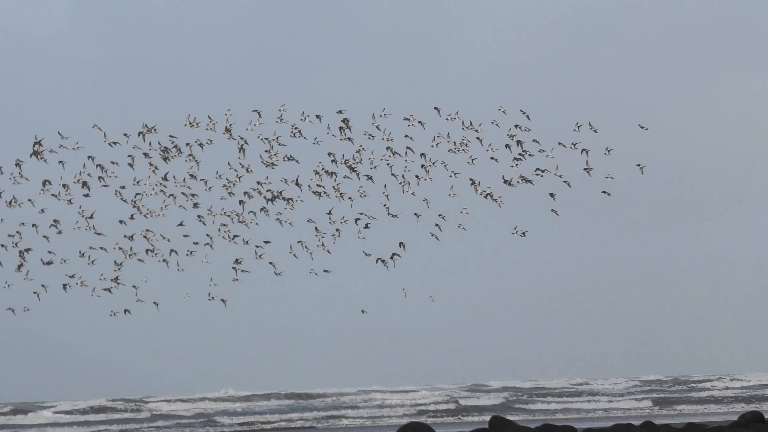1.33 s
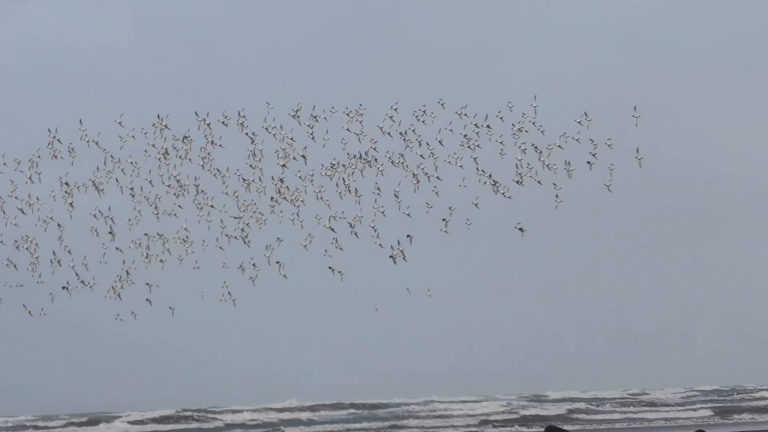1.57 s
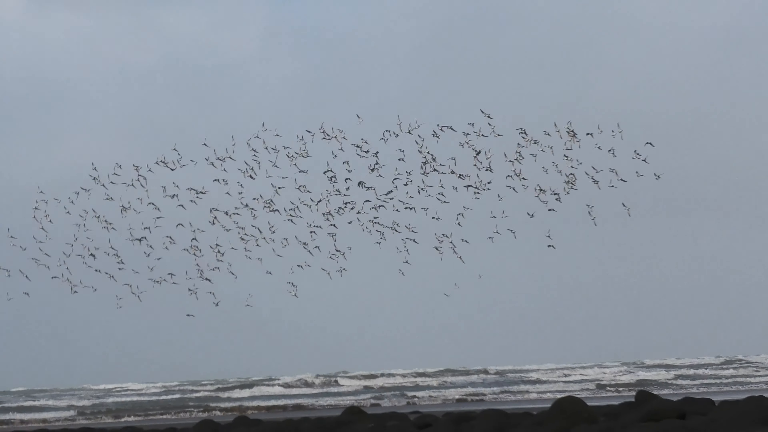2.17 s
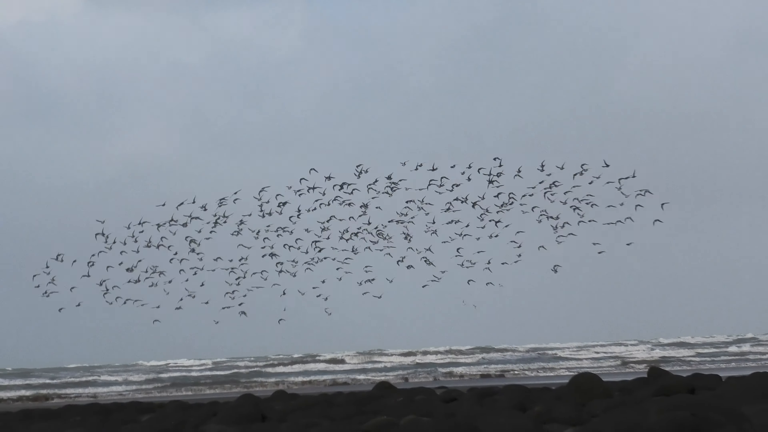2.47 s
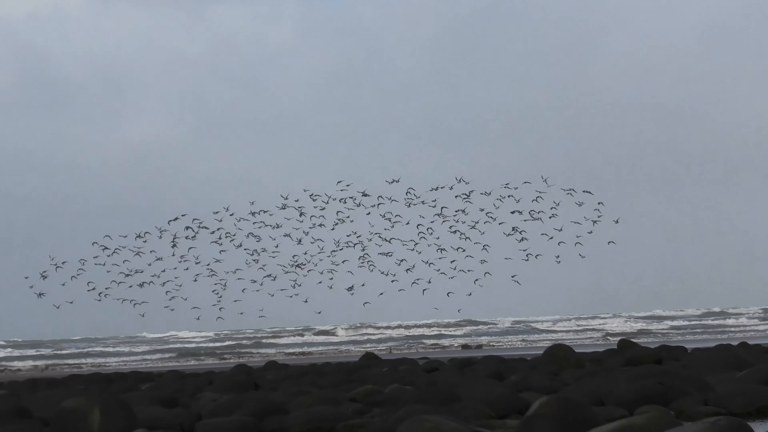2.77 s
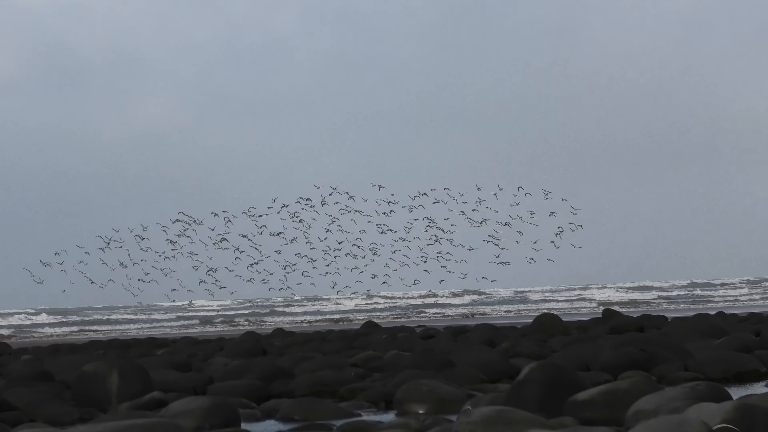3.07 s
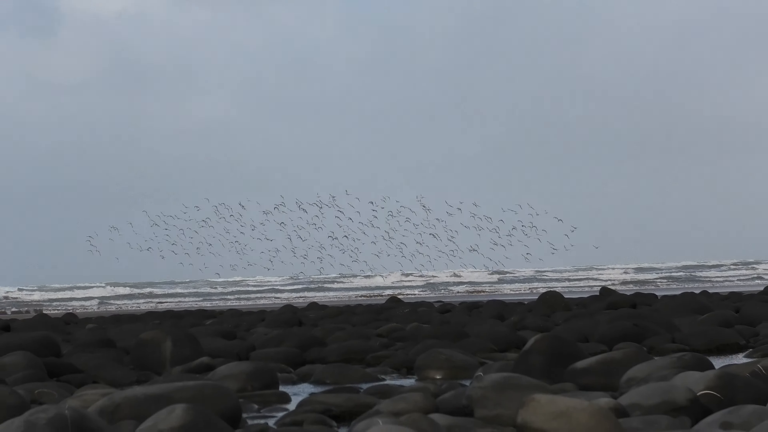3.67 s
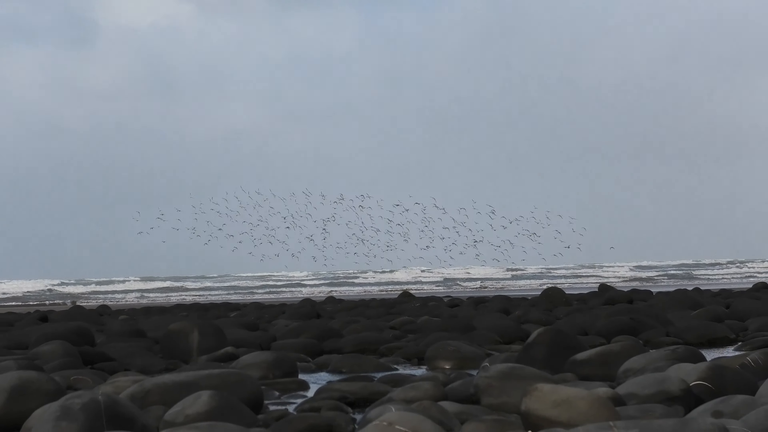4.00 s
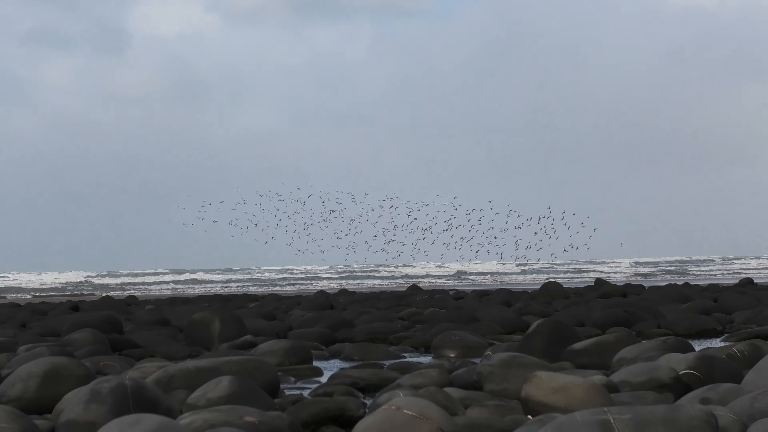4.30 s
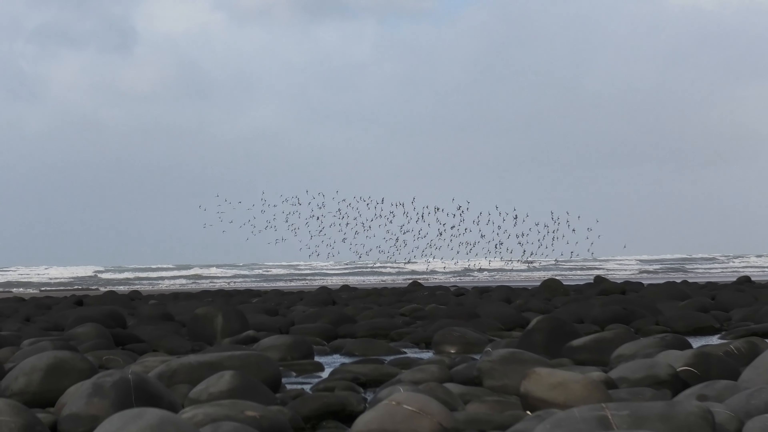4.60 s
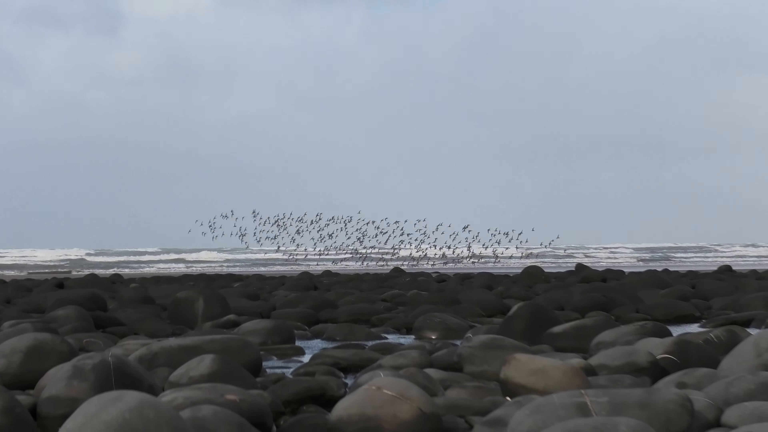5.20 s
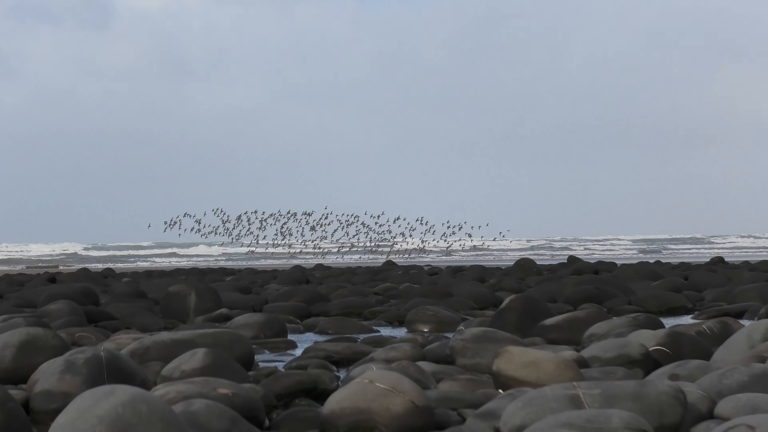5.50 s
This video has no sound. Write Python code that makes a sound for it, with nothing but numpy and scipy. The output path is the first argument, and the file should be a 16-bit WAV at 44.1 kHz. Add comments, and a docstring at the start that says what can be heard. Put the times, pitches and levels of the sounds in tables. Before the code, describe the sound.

Wind blows on the microphone on a boulder shore throughout, a fluttering, surf-like roar with a thin hiss that surges and ducks along with it. Underneath, distant breaking waves blend into a wide, even wash, beside a quiet low rumble that sits mostly on the left. Short blasts and dips shake the roar in the first half second. Around 1 second, three tiny, bright ticks sound close by, followed by a strong gust at about 1.2 seconds. The wind eases by 1.5 seconds, then swells near 2.3 seconds and again from 3 to 3.3 seconds, spitting brief, sharp crackles. From 3.4 to 5 seconds it is a little lower but choppy, with quick blasts and sudden drops. From 5 seconds to the end, at about 5.6 seconds, it grows louder again, with the thickest crackle.

```python
"""A fluttering, surf-like roar and a thin hiss surge and duck together in gusty wind on a boulder shore.
Both are shaped noise, with slow swells, sudden blasts and brief dips; sharp crackles spit on top.
Underneath, distant breaking waves blend into an even wash, beside a low rumble.
A few tiny ticks sound close by."""
import sys
import numpy as np
from scipy import signal
from scipy.fft import rfft, irfft, next_fast_len
from scipy.io import wavfile

SR = 44100
rng = np.random.default_rng(int(sys.argv[2]) if len(sys.argv) > 2 else 0)


def master_out(mix):
    """Clip the mix to full scale and print it as 16-bit PCM to the path in sys.argv[1]."""
    frames = np.transpose(np.atleast_2d(mix))
    ceiling = np.clip(frames, -1, 1)
    pcm = np.round(ceiling * 32767).astype(np.int16)
    wavfile.write(sys.argv[1], SR, pcm)


N = 249165
TIME = np.arange(N) / SR
FREQ = np.maximum(np.arange(N // 2 + 1) * SR / N, 1)


def gain(db):
    """Turn decibels into a number to multiply by."""
    return 10 ** (np.asarray(db) / 20)


def unit(x):
    """Scale to an average size (rms) of 1."""
    return x / np.sqrt(np.mean(x ** 2))


def by_frequency(rows):
    """Turn each column after the first (Hz) into a curve over all frequencies."""
    hz, *columns = np.transpose(rows)
    return [np.interp(np.log(FREQ), np.log(hz), column) for column in columns]


def colour(noise, tone):
    """Shape noise with a tone table, then scale it to size 1."""
    return unit(irfft(rfft(noise) * gain(by_frequency(tone)[0]), N))


def split(x, hz):
    """The parts of a sound below and above a frequency."""
    low = irfft(rfft(x) / (1 + (FREQ / hz) ** 4), N)
    return low, x - low


def band(x, band_hz):
    """Keep what lies between two frequencies."""
    return signal.sosfilt(signal.butter(4, band_hz, "bandpass", fs=SR, output="sos"), x)


def wander(hz):
    """A smooth random wobble of size 1, up to about hz times a second."""
    size = next_fast_len(N)
    freq = np.arange(size // 2 + 1) * SR / size
    slow = rfft(rng.standard_normal(size)) / (1 + (freq / hz) ** 4)
    return unit(irfft(slow, size)[:N])


def stereo_noise(likeness, lead=0):
    """Left and right noise, partly shared; lead shifts the shared part's phase on the right."""
    left, own = rfft(rng.standard_normal((2, N)))
    right = likeness * np.exp(1j * lead) * left + np.sqrt(1 - likeness ** 2) * own
    return irfft(np.array([left, right]), N)


def pan(x, left_db):
    """Make the left side left_db louder than the right."""
    return irfft(rfft(x) * gain(np.array([[.5], [-.5]]) * left_db), N)


def crackle(per_second, spread_db):
    """Tiny random pops: many faint ones and a few that stand out."""
    pops = rng.random(N) < per_second / SR
    size = np.minimum(rng.exponential(size=N), 6)
    return unit(pops * gain(spread_db * size) * rng.choice([-1, 1], N))


def swells(rows, steepness=2.93):
    """Brief bumps and dips in dB; the level builds more slowly than it drops."""
    level_db = np.zeros(N)
    for time, half_length, db in rows:
        near = slice(*np.searchsorted(TIME, [time - 5 * half_length, time + 5 * half_length]))
        age = TIME[near] - time
        rising = (age < 0) == (db > 0)
        width = half_length * np.where(rising, 1.15, .85)
        level_db[near] += db * np.exp(-.5 * np.abs(age / width) ** steepness)
    return level_db


# Slow changes in the loudness of the roar: (time [s], level [dB])
SURGE_LEVELS = [(0.0, -35.5), (0.6, -32.5), (0.8, -34), (0.95, -37), (1.16, -34), (1.2, -27), (1.33, -29.5),
                (1.38, -34.5), (1.5, -37.5), (1.91, -36), (2.28, -31), (2.39, -32.5), (2.84, -33.2),
                (3.0, -29.5), (3.1, -30), (3.19, -31), (3.42, -37.5), (3.55, -35.5), (3.65, -36.5),
                (4.08, -32.5), (4.14, -37), (4.99, -32), (5.07, -28.5), (5.21, -28.5), (5.38, -30.5),
                (5.45, -29.5), (5.65, -29)]
def surges():
    """The slow rise and fall that the roar and hiss share, in dB."""
    return np.interp(TIME, *np.transpose(SURGE_LEVELS))


def flutter():
    """The loudness shakes at random, faster than the surges; the swing is in dB."""
    wobble_db = 0.2 * wander(hz=39)
    shudder_db = 1.13 * wander(hz=65.6)
    swing_db = wobble_db + shudder_db
    swing_db -= .12 * swing_db ** 2  # dips go deeper than peaks go high
    return split(swing_db, hz=1.1)[1]  # keep only the fast part


# Tone of the roar: (frequency [Hz], relative level [dB])
ROAR_TONE = [(60, -55), (100, -30.5), (150, -9), (210, -2), (380, 3.5), (560, 1), (950, -4.5),
             (1700, -14.5), (2500, -26.5), (3500, -38), (5000, -53.5), (7000, -74), (11000, -100)]
# Its stereo spread: (frequency [Hz], likeness [0-1], right lead [radians], left minus right [dB])
ROAR_STEREO = [(129, 0.1, -2.5, 8), (218, 0.48, 2, 4.5), (440, 0.33, 3, 0.4), (1300, 0.41, 3, 1.5),
               (2540, 0.52, 2, 0), (3580, 0.5, 2.14, -0.5), (6000, 0.2, 5, -6.5)]
def roar(level_db, flutter_db, bite_db):
    """A surf-like roar: both sides surge together, but each also flickers on its own."""
    likeness, lead, left_db = by_frequency(ROAR_STEREO)
    own_db = 0.93 * np.array([wander(hz=33), wander(hz=24)])
    shared_db = 1.58 * wander(hz=190)
    noise = stereo_noise(likeness, lead) * gain(own_db + shared_db)
    noise = pan(colour(noise, ROAR_TONE), left_db)
    low, high = split(noise, hz=1100)
    # the louder the roar, the brighter it gets
    bright_db = 0.11 * (level_db - level_db.mean()) + bite_db + 0.22 * wander(hz=6.4)
    return (low + gain(bright_db) * high) * gain(level_db + flutter_db + 0.03)


# Loudness of the hiss before the surges are added: (time [s], relative level [dB])
HISS_LEVELS = [(0, -83), (.11, -79), (.53, -84), (.85, -82), (1.0, -77), (1.33, -83), (2.33, -79),
               (2.64, -83), (2.98, -82), (3.35, -84), (3.49, -79), (4.07, -77.5), (4.16, -79), (4.3, -76.5),
               (4.8, -85), (5.2, -79), (5.38, -79.5), (5.65, -76.5)]
# Tone of the hiss: (frequency [Hz], relative level [dB])
HISS_TONE = [(500, -20.5), (1500, 0.5), (3500, 13), (5500, 3.5), (8500, -.5), (10000, -7.5), (12000, -17.5),
             (15000, -20)]
def hiss(surge_db, sudden_db, flutter_db):
    """A fine, crackling hiss rises and falls with the roar, alike on both sides."""
    strength_db = np.interp(TIME, *np.transpose(HISS_LEVELS)) + 0.75 * (surge_db - surge_db.mean())
    swing_db = 0.61 * sudden_db + 0.9 * flutter_db
    noise = stereo_noise(likeness=0.98) * gain(1.7 * wander(hz=400))
    noise += gain(-9) * crackle(per_second=700, spread_db=2)
    low, top = split(colour(noise, HISS_TONE), hz=10800)
    # only the strongest hiss opens the very top into a sizzle
    sizzle_from_db = -76.5
    sizzle_db = np.clip(8 * (strength_db - sizzle_from_db), -2, 8)
    return (low + top * gain(sizzle_db)) * gain(strength_db + swing_db + 8)


# Tone of the rumble: (frequency [Hz], relative level [dB])
RUMBLE_TONE = [(20, -36), (45, -41), (68, -30), (100, -8.5), (135, -2), (175, 1.5), (220, 0.5), (300, 0.5),
               (600, -38.5), (3000, -110)]
def rumble():
    """Big, slow whirls of air keep up a low rumble, mostly on the left."""
    air = colour(stereo_noise(likeness=.6), RUMBLE_TONE)
    return pan(air, left_db=6) * gain(-49.5 + 1.1 * wander(hz=21))


# Tone of the surf: (frequency [Hz], relative level [dB])
SURF_TONE = [(60, -38), (130, -30.5), (250, 8), (550, 0.5), (1100, -5), (2200, -18), (4500, -39),
             (7000, -62.5), (11000, -84)]
def surf():
    """Many distant breaking waves blend into a wide, gently heaving wash."""
    wash = colour(stereo_noise(likeness=0.035), SURF_TONE)
    return wash * gain(-45 + 0.51 * wander(hz=1.8))


# Sudden blasts: (time [s], half length [s], level change [dB], bite [dB])
SUDDEN_BLASTS = [(0.046, 0.016, 6, 3), (0.11, 0.03, 4.5, -1.5), (0.176, 0.008, 12, -1.5),
                 (0.307, 0.021, 4.5, -3), (0.481, 0.0069, 5, 2.5), (0.677, 0.008, -1, 1),
                 (1.133, 0.011, 4, -0.5), (1.438, 0.013, 4.5, 1), (1.618, 0.011, 5.5, -2),
                 (1.7, 0.008, 8.5, -2.5), (1.735, 0.021, 5, 0), (1.859, 0.0039, 3, 1),
                 (1.956, 0.0096, 4.5, -3), (2.057, 0.0082, 2.5, 4.5), (2.107, 0.0027, 1, 3),
                 (2.191, 0.007, 4, 0), (2.21, 0.0038, 4, -1), (2.28, 0.011, 1, 3), (2.454, 0.016, 5, -4.5),
                 (2.573, 0.012, 5, 1.5), (2.598, 0.003, 6.5, 1), (2.637, 0.006, 5, -11),
                 (2.75, 0.0048, 5.5, -6.5), (2.869, 0.0054, 4.5, -2.5), (2.966, 0.013, 1, 3),
                 (3.23, 0.011, 5, 6), (3.255, 0.0074, 7, -1.5), (3.396, 0.0064, 4, 4.5),
                 (3.593, 0.0062, 1.5, -4), (3.672, 0.018, 3.5, 0), (3.715, 0.014, 5.5, 0),
                 (3.788, 0.013, 6.5, -5), (3.829, 0.0077, 4.5, 1.5), (3.91, 0.0085, 3.5, -10),
                 (3.962, 0.017, 4.5, -4), (4.048, 0.011, 3.5, -4), (4.203, 0.0045, 8.5, -6),
                 (4.289, 0.0085, 2.5, 4), (4.4, 0.015, 6.5, -0.5), (4.541, 0.019, 8, -4.5),
                 (4.621, 0.0062, 4.5, 7.5), (4.692, 0.0049, 6.5, -3.5), (4.77, 0.0072, -0.5, 2),
                 (4.94, 0.0052, 3, -2), (5.027, 0.008, 1.5, -0.5), (5.089, 0.0063, 4, -5.5),
                 (5.139, 0.012, 3.5, 0.5), (5.184, 0.006, -2.5, 4), (5.221, 0.0046, 7, -3),
                 (5.296, 0.0086, 1.5, 1.5), (5.399, 0.007, 1.5, 1), (5.46, 0.014, 1, 3),
                 (5.507, 0.004, 2.5, 0.5), (5.558, 0.012, 3, 4)]
def blasts():
    """The roar and hiss jump for a moment; bite is an extra change in the high part of the roar."""
    blast_db = swells([(time, half, db) for time, half, db, _ in SUDDEN_BLASTS])
    bite_db = swells([(time, half, bite) for time, half, _, bite in SUDDEN_BLASTS])
    return blast_db, bite_db


# Brief dips in loudness, and one rise: (time [s], half length [s], level change [dB])
LOUDNESS_DIPS = [(0.075, 0.0053, -7.5), (0.201, 0.022, -9), (0.397, 0.019, -8.5), (0.512, 0.011, -3),
                 (0.9, 0.011, -1.5), (1.573, 0.0072, -5.5), (1.652, 0.0061, -11.5), (2.0, 0.012, -2.5),
                 (2.513, 0.023, -5), (2.675, 0.022, -5.5), (3.437, 0.0078, -12), (3.467, 0.005, -9.5),
                 (3.615, 0.012, -5.5), (3.753, 0.0078, -1), (4.245, 0.0048, 5), (4.48, 0.011, -2.5),
                 (4.658, 0.01, -8), (4.722, 0.0085, -9.5), (4.792, 0.0052, -13.5), (4.875, 0.007, -9),
                 (5.003, 0.0059, -7), (5.158, 0.0033, -1), (5.237, 0.012, -8.5), (5.391, 0.006, -13.5)]
def dips():
    """The roar and hiss duck for a moment; the change is in dB."""
    return swells(LOUDNESS_DIPS)


# Spurts of crackle: (time [s], half length [s], level [dB])
SPIT_SPURTS = [(0.162, 0.011, -70), (0.477, .005, -69), (2.347, 0.0093, -65), (2.573, .004, -61),
               (2.596, 0.0018, -63), (2.954, 0.012, -62.5), (3.015, .01, -65.5), (3.132, .003, -64),
               (3.218, 0.0062, -60), (3.24, .006, -63), (3.253, 0.0041, -60), (3.495, 0.023, -68),
               (3.65, .0015, -60), (3.818, .008, -65), (4.066, .007, -64), (4.414, 0.01, -65),
               (4.525, .008, -65), (4.888, .002, -67), (5.138, .004, -58), (5.17, .003, -58),
               (5.192, .008, -57.5), (5.217, .004, -54), (5.285, 0.0056, -57.5), (5.406, .004, -62),
               (5.44, 0.011, -58.5), (5.47, .006, -54.5), (5.498, .003, -60), (5.569, .003, -52.5)]
# Tone of the spits: (frequency [Hz], relative level [dB])
SPIT_TONE = [(500, -12), (2000, 11), (3200, 17.5), (4500, 7), (6000, 2.5), (9000, -1), (11000, -6.5),
             (13000, -12), (15000, -24)]
def spits():
    """The hardest gusts tear at the microphone in short spurts of sharp crackle."""
    loudness = sum(gain(db) * np.exp(-.5 * ((TIME - time) / half) ** 2) for time, half, db in SPIT_SPURTS)
    grains = crackle(per_second=1100, spread_db=3.5) + gain(-2.5) * stereo_noise(likeness=0.46)
    return colour(grains, SPIT_TONE) * loudness


# Tiny ticks: (time [s], peak level [dB], low edge [Hz], high edge [Hz])
CLOSE_TICKS = [(0.9412, -54, 7800, 11200), (0.9818, -62, 7800, 11000), (1.0878, -62, 6300, 9300)]
def ticks(rustle_db=-27, fade_s=0.055):
    """Hard things touch close by: each gives a bright snap, then a faint, airy rustle."""
    snaps, rustle = np.zeros((2, N))
    for time, db, low_hz, high_hz in CLOSE_TICKS:
        snap = band(signal.unit_impulse(N, int(time * SR)), [low_hz, high_hz])
        snaps += gain(db) * snap / np.abs(snap).max()
        age = np.maximum(TIME - time, 0)
        rustle += gain(db + rustle_db) * (age > 0) * np.exp(-age / fade_s)
    return snaps + band(rustle * rng.standard_normal(N), band_hz=[3000, 15000])


def scene():
    """The roar and hiss surge and duck together; the other sounds are added to them."""
    surge_db, flutter_db = surges(), flutter()
    blast_db, bite_db = blasts()
    sudden_db = blast_db + dips()
    rush = roar(surge_db + sudden_db, flutter_db, bite_db) + hiss(surge_db, sudden_db, flutter_db)
    return rush + spits() + rumble() + surf() + ticks()


def record(dry):
    """The camera that holds the microphone cuts off the highest treble."""
    top_hz = 15000
    return signal.sosfilt(signal.ellip(8, .2, 70, top_hz, fs=SR, output="sos"), dry)


dry = scene()
out = record(dry)
master_out(out)
```